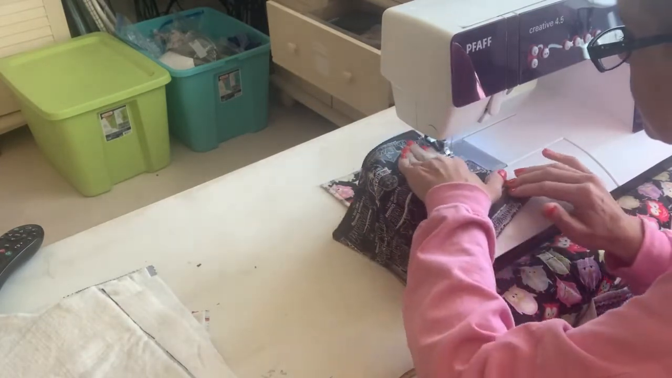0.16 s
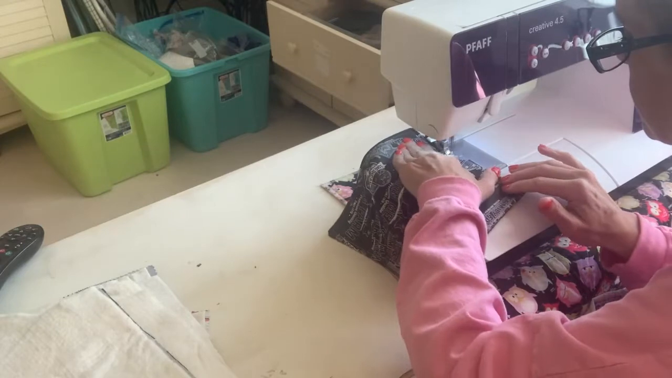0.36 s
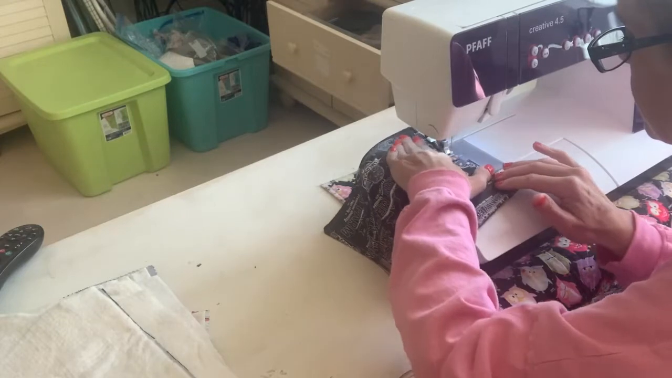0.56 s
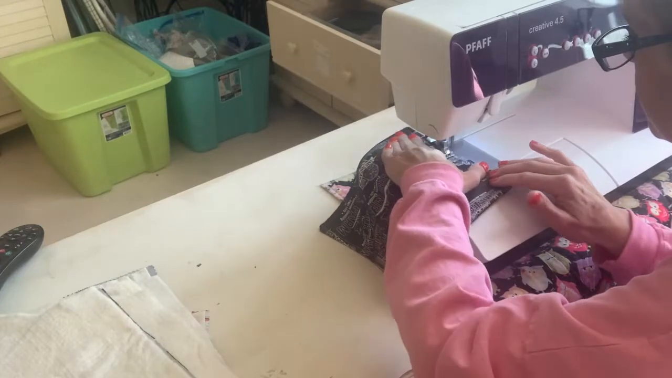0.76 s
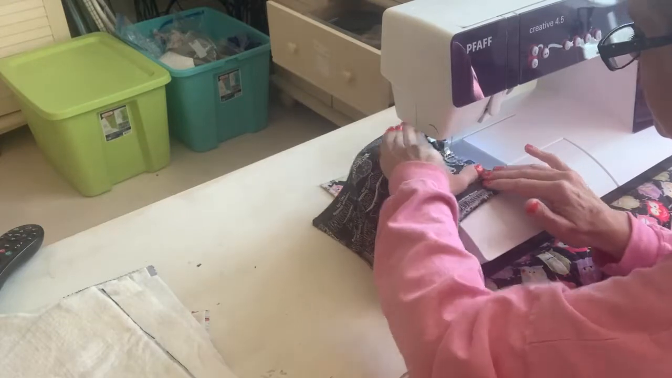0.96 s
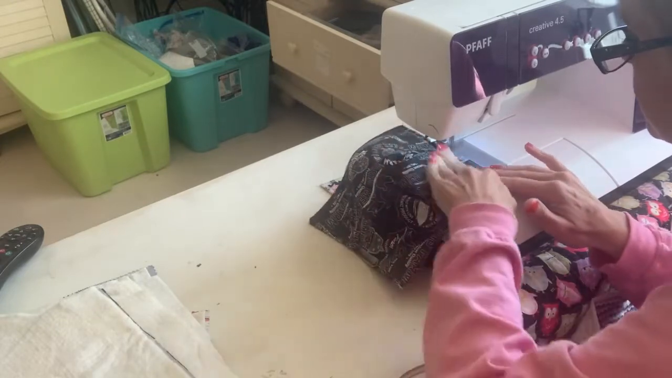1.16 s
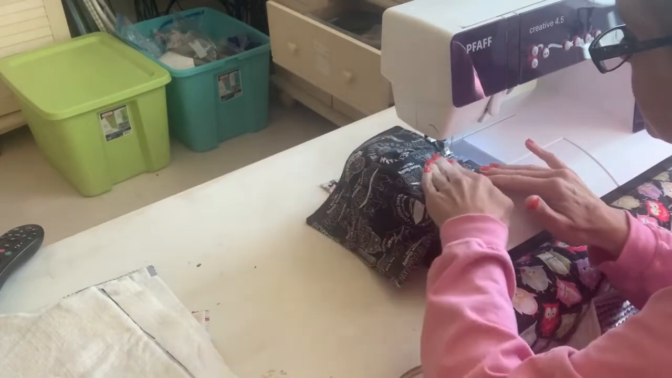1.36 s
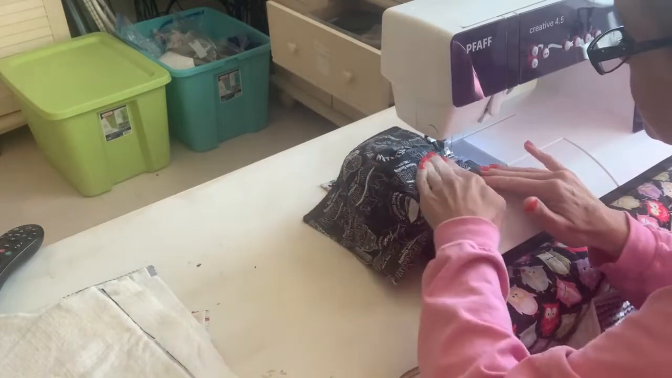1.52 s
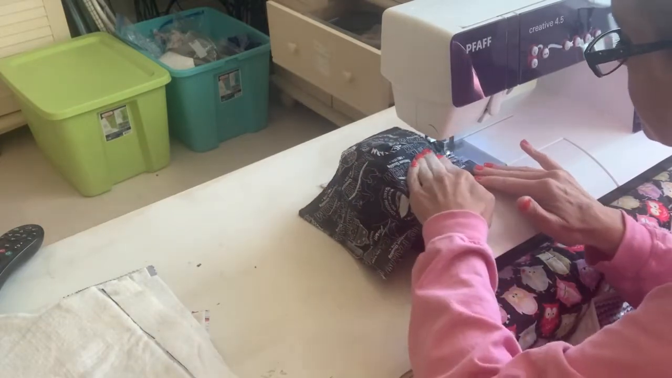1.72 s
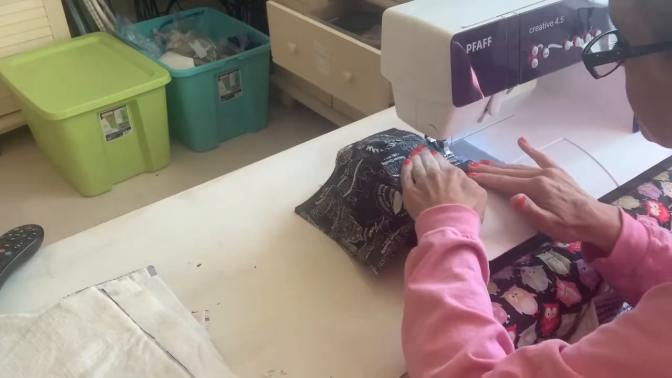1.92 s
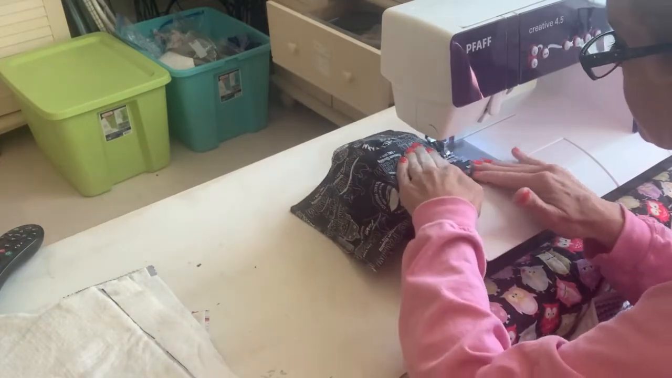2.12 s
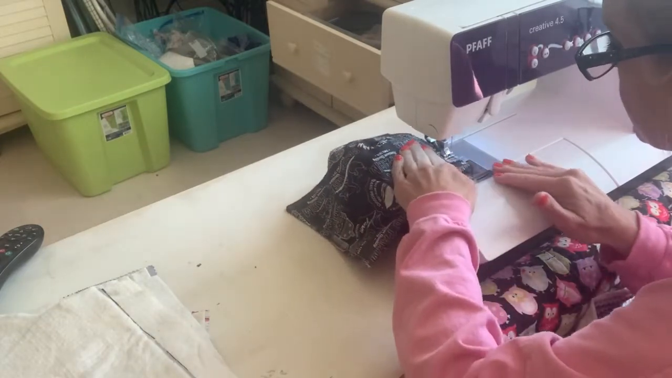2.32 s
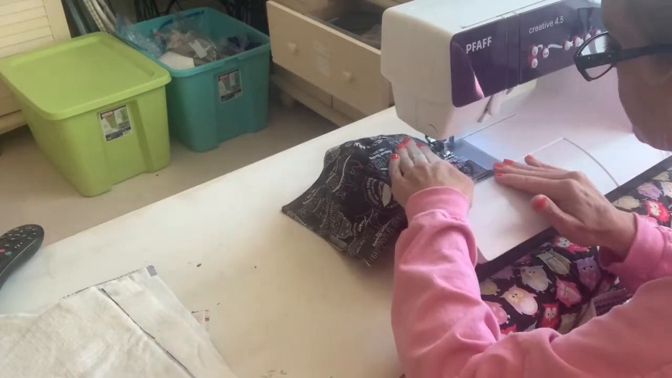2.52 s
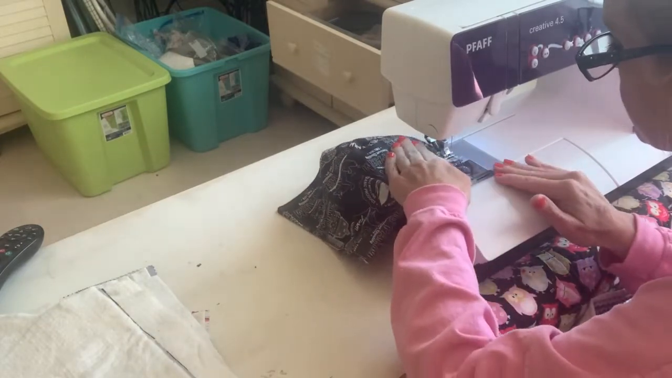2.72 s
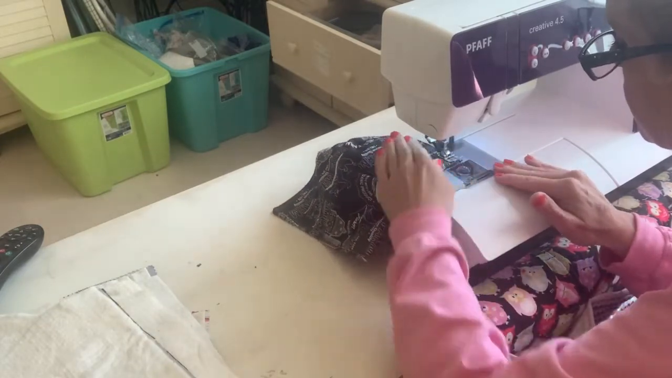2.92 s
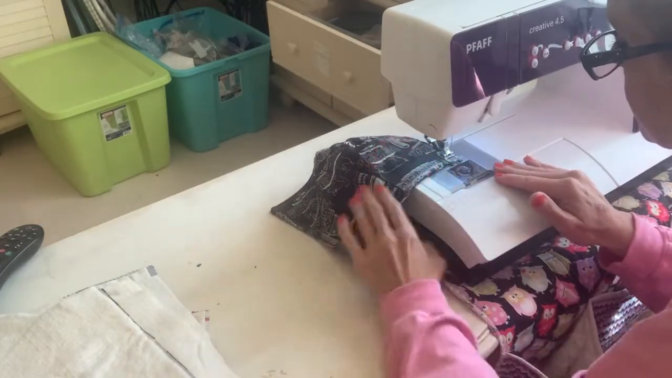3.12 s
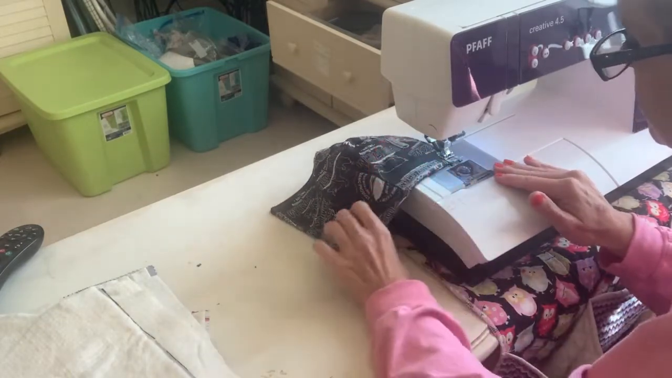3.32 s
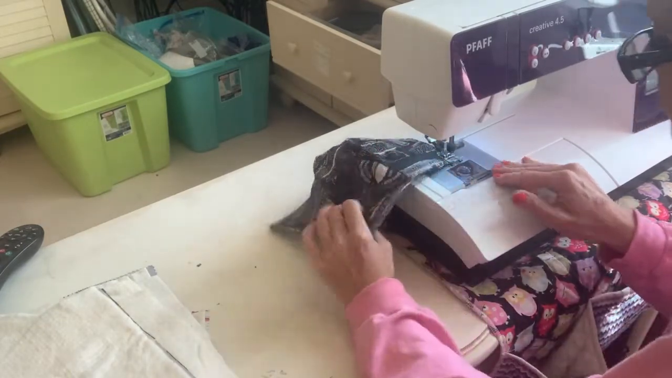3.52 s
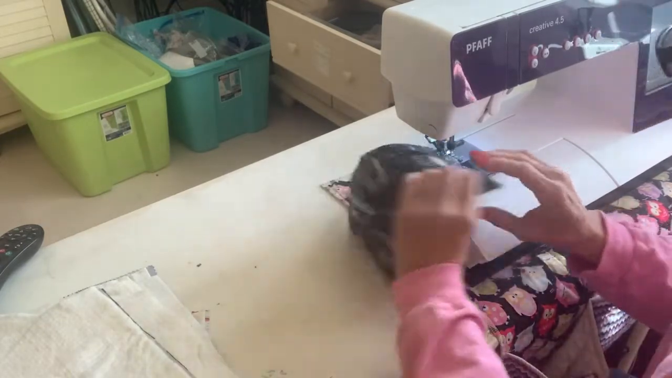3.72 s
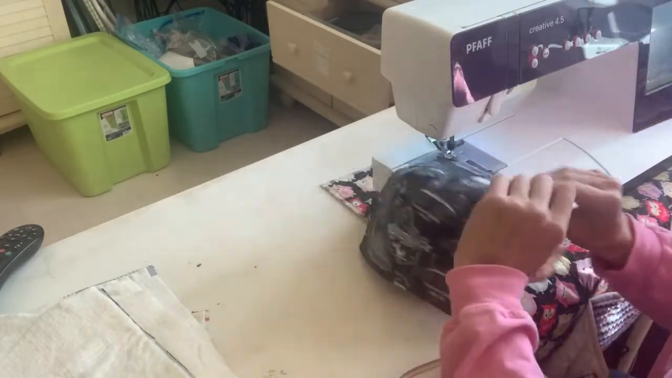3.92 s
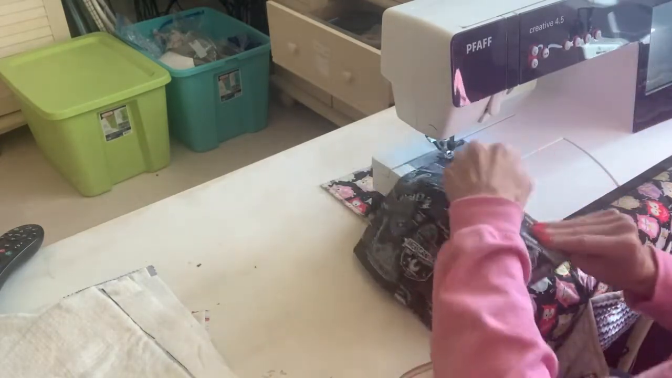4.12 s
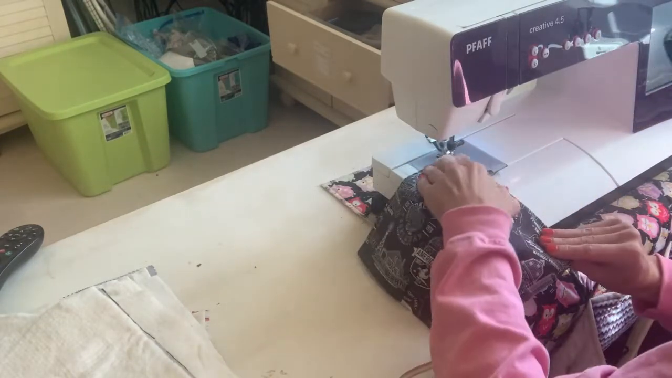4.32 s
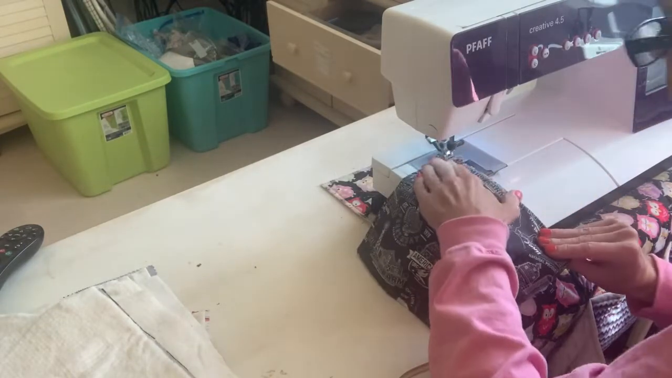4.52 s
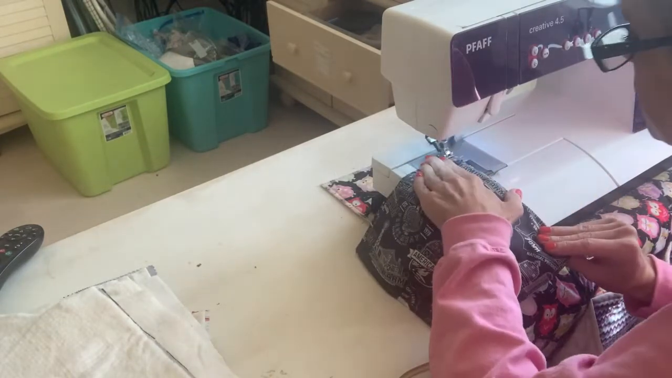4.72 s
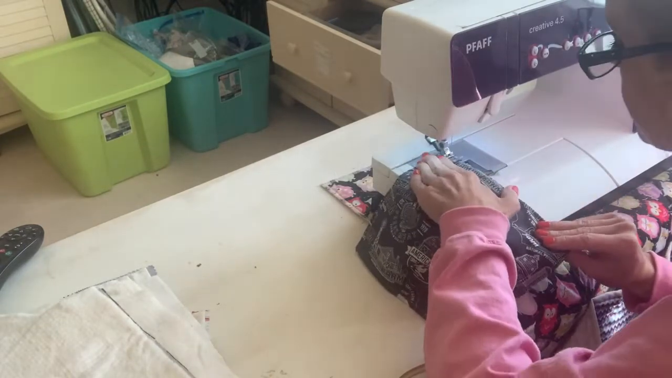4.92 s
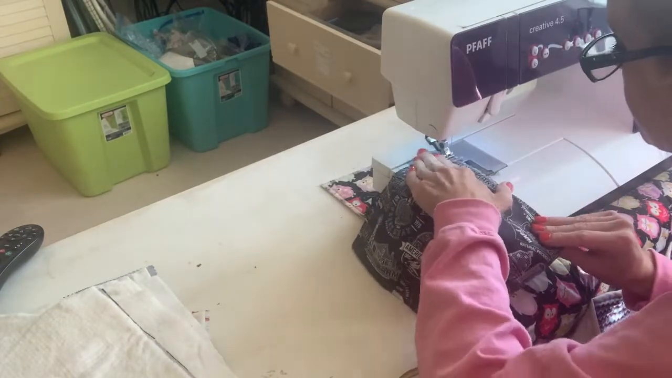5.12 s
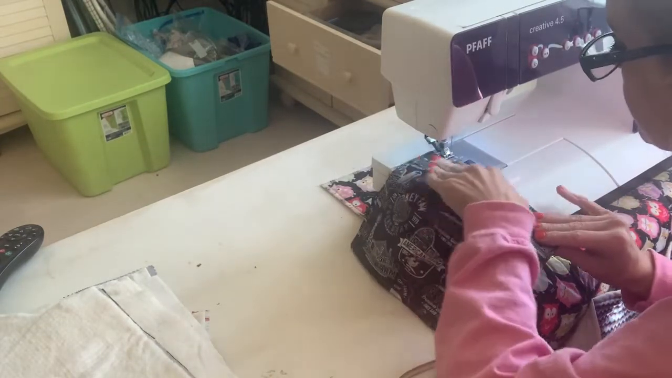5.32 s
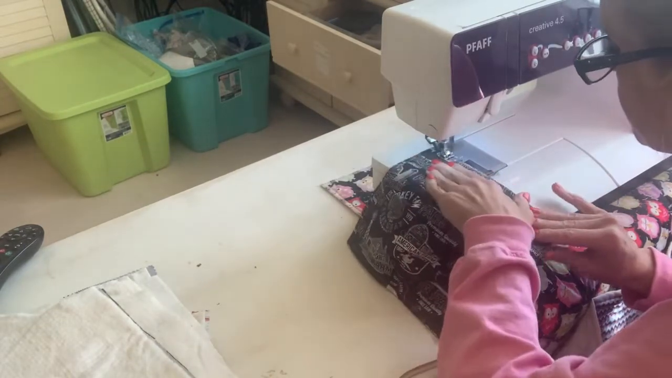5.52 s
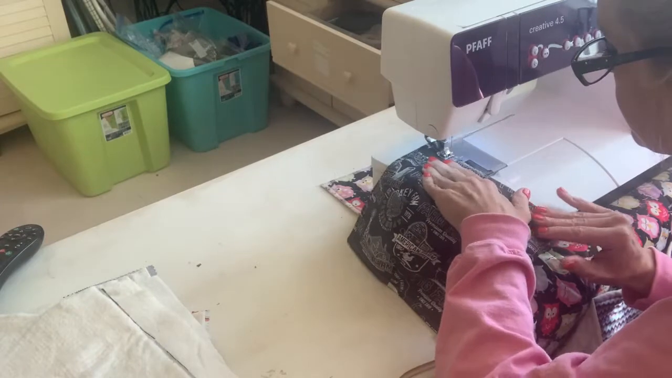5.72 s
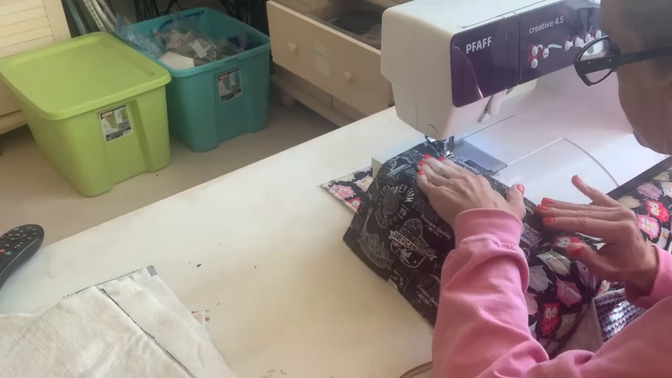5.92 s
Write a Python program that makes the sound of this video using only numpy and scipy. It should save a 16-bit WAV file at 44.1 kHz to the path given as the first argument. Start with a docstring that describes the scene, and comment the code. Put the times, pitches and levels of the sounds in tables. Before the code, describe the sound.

Rapid sewing machine clatter and whine, broken by a short pause of soft fabric rustling and clicks, then steady stitching again indoors.

```python
"""An electric sewing machine stitches at full speed through layered fabric, stops, and runs up again.
Every shaft turn repeats the same frame shake, linkage taps, gear ring and thread ticks over the whine
of the toothed drive and the rumble of the table. In the pause hands turn the cloth and the presser foot
comes down, ringing. Scattered knocks thump the table; a small room answers."""
import sys
import numpy as np
from scipy import signal
from scipy.fft import rfft, irfft, next_fast_len
from scipy.io import wavfile
from scipy.ndimage import uniform_filter1d, map_coordinates

SR = 44100
rng = np.random.default_rng(int(sys.argv[2]) if len(sys.argv) > 2 else 0)


def wav_record(signal):
    """Record a signal, one row per channel, as 16-bit PCM in the file named by sys.argv[1]."""
    frames = np.transpose(np.atleast_2d(signal))
    bounded = np.clip(frames, -1, 1)
    # unit amplitude maps onto the largest positive 16-bit level
    quanta = np.round(bounded * 32767).astype(np.int16)
    wavfile.write(sys.argv[1], SR, quanta)


N = 267246
TIME_S = np.arange(N) / SR
TOP_STITCH_HZ = 17.4986  # one stitch per shaft turn


def amp(db):
    """Decibels to gain."""
    return 10 ** (np.asarray(db) / 20)


def unit(x):
    """Scale the channel mean to rms 1."""
    return x / np.sqrt(np.mean(np.atleast_2d(x).mean(0) ** 2) + 1e-20)


def along(points, hz):
    """Interpolate (frequency [Hz], value) points on a log axis."""
    point_hz, values = np.transpose(points)
    return np.interp(np.log(hz + 1), np.log(point_hz + 1), values)


def wobble(rate_hz):
    """Smooth random curve with knots at rate_hz."""
    knots = rng.standard_normal(int(N * rate_hz / SR) + 4)
    coarse = np.arange(0, N + 64, 64)
    return np.interp(np.arange(N), coarse, map_coordinates(knots, [coarse * rate_hz / SR]))


def filtered(x, response):
    """Apply a complex frequency response."""
    size = next_fast_len(N + SR // 2, True)
    return irfft(rfft(x, size) * response(np.fft.rfftfreq(size, 1 / SR)), size)[..., :N]


def coloured(x, points, size=4096):
    """Minimum-phase filter through (frequency [Hz], gain [dB]) points."""
    cepstrum = irfft(np.log(amp(along(points, np.fft.rfftfreq(size, 1 / SR)))))
    cepstrum[1:size // 2] *= 2
    cepstrum[size // 2 + 1:] = 0
    return signal.fftconvolve(x, irfft(np.exp(rfft(cepstrum))))[:N]


def diffuse_noise(spectrum, correlation, left_db):
    """Stereo noise with a channel mean of rms 1."""
    mid, side = filtered(rng.standard_normal((2, N)), lambda hz: amp(along(spectrum, hz)))
    side = side * np.tan(np.arccos(np.clip(correlation, -.9, .9)) / 2)
    return unit(np.array([(mid + side) * amp(left_db), mid - side]))


# Room decay: (frequency [Hz], t60 [s])
ROOM_T60 = [(100, 0.15), (500, 0.45), (2000, 0.47), (6000, 0.38), (12000, 0.45)]
# Shading of the right side: (frequency [Hz], left minus right [dB])
BALANCE = [(60, 17), (100, -2), (170, 8.5), (300, 8), (510, 4), (860, 4.5), (1470, 11), (2500, 11.5),
           (4270, 14.5), (7270, 12)]
def in_room(x, wet_db, left_lag_s=.00047):
    """Direct sound reaches the shaded right side first; walls and table add a tail."""
    def shading(hz):
        balance_db = along(BALANCE, hz)
        return 2 * amp(np.outer([.5, -.5], balance_db)) / np.sqrt(amp(balance_db) + amp(-balance_db))

    hz, t, noise = signal.stft(rng.standard_normal((2, SR // 2)), SR, nperseg=256)
    response = signal.istft(noise * amp(-60 * t / along(ROOM_T60, hz)[:, None]), SR, nperseg=256)[1]
    response *= amp([[wet_db], [wet_db + 15.5]]) / np.linalg.norm(response[0])
    response[0, round(left_lag_s * SR)] += 1
    response[1, 0] += 1
    response /= np.linalg.norm(response, axis=1, keepdims=True)
    return filtered(signal.fftconvolve(x[None], response, axes=1)[:, :N], shading)


# Still-room spectrum: (frequency [Hz], relative level [dB])
ROOM_SPECTRUM = [(15, -52), (25, -2), (64, 2), (333, -12.5), (424, -11), (685, -14), (2960, -24.5),
                 (3420, -24.5), (4140, -25), (7720, -32), (10000, -35.5), (14000, -33), (17000, -120)]
def room_tone(level_db=-76):
    """Faint, steady noise of the room."""
    return amp(level_db) * diffuse_noise(ROOM_SPECTRUM, correlation=.16, left_db=-.5)


# Hand strokes: (start [s], length [s], drag [dB], swish [dB])
HAND_STROKES = [(3.076, 0.21, -59, -66), (3.354, 0.35, -62, -74), (3.616, 0.14, -65, -59),
                (3.768, 0.051, -53.5, -65.5), (3.93, 0.11, -71.5, -95), (4.277, .04, -73, -80),
                (4.356, 0.056, -65.5, -65), (4.487, 0.16, -64, -58), (4.64, 0.13, -56, -53.5)]
# Cloth friction spectra: (frequency [Hz], relative level [dB])
DRAG_SPECTRUM = [(25, -20), (50, -6), (150, -3.5), (280, -8), (480, -22), (800, -31), (1600, -39),
                 (3000, -40.5), (7500, -49), (11000, -74)]
SWISH_SPECTRUM = [(120, -16), (270, 3), (520, 1.5), (720, -3.5), (950, -14.5), (1250, -11), (2000, -29),
                  (3500, -28), (7000, -51), (11000, -51)]
def fabric(attack_s=.024, release_db_per_s=122, uneven_db=1):
    """Under each hand stroke the cloth drags dully over the table and swishes as it slides."""
    drag = swish = 0
    for start_s, length_s, drag_db, swish_db in HAND_STROKES:
        release = amp(-release_db_per_s * np.maximum(TIME_S - start_s - length_s, 0))
        stroke = np.clip((TIME_S - start_s) / attack_s, 0, 1) * release
        drag = np.hypot(drag, amp(drag_db) * stroke)
        swish = np.hypot(swish, amp(swish_db) * stroke)
    uneven = amp(uneven_db * wobble(35))
    drag = drag * diffuse_noise(DRAG_SPECTRUM, correlation=.2, left_db=-.5)
    swish = swish * diffuse_noise(SWISH_SPECTRUM, correlation=0, left_db=6)
    return uneven * (drag + swish)


# Presser arm modes: (frequency [Hz], relative level [dB], t60 [s])
ARM_MODES = [(845, 1, 0.12), (1080, 3.5, 0.13), (1166, 12.5, 0.095), (1240, 8, 0.11), (1502, -16, .15)]
def presser_foot(start_s=4.524, attack_s=.005, gain_db=-51.5):
    """The foot comes down on the seam and its arm rings."""
    t = np.maximum(TIME_S - start_s, 0)
    flutter_rad = .5 * wobble(120)
    ring = sum(amp(db - 60 * t / t60_s) * np.sin(2 * np.pi * hz * t + flutter_rad)
               for hz, db, t60_s in ARM_MODES)
    return amp(gain_db) * in_room(ring * (1 - np.exp(-t / attack_s)), wet_db=-7)


# Presser foot, needle bar, table bumps: (time [s], thump gain [dB], clack gain [dB], click gain [dB])
KNOCK_EVENTS = [(0.635, -34, -38, -54), (1.644, -39, -35, -38.5), (1.874, -42, -34, -53),
                (3.124, -47, -51, -46.5), (3.634, -50, -56, -75), (3.816, -39.5, -48, -55.5),
                (3.832, -38, -69, -72), (4.004, -75, -79, -95), (4.357, -54, -52, -50),
                (4.389, -48, -55, -56), (4.523, -57, -51.5, -85), (4.535, -62, -54, -85),
                (4.618, -59, -56, -78), (4.674, -64, -50, -51), (4.695, -61, -43.5, -46.5),
                (4.816, -54, -57, -45.5), (4.862, -34.5, -42, -49), (4.91, -49, -49, -45),
                (5.16, -40.5, -39, -47), (5.956, -38, -29, -41), (5.973, -45, -32.5, -50)]
# Table modes: (frequency [Hz], relative level [dB], t60 [s])
TABLE_MODES = [(105, 1.5, 0.18), (133, -8.5, 0.14), (206, -8, 0.072), (295.3, 0, 0.092), (395, -7.5, 0.076),
               (523, -7, 0.1)]
# Casing clack and steel click spectra: (frequency [Hz], relative level [dB])
CLACK_SPECTRUM = [(250, -32), (530, 2.5), (700, -7), (820, -10), (970, -4.5), (1150, -1.5), (1350, -5),
                  (2000, -9), (2700, -11.5), (3600, -34), (7000, -65)]
CLICK_SPECTRUM = [(1500, -9), (2600, -2.5), (3200, -5), (4000, -2.5), (4800, -6.5), (5400, -4), (6300, -4),
                  (8000, -16), (10000, -31), (11500, -36), (13500, -61)]
def knocks(firm_db=-43, rattle_t60_s=.071):
    """Each contact thumps the table and rattles the casing and the steel."""
    t = np.arange(SR // 2) / SR
    blows = np.zeros((3, N + SR))
    for start_s, thump_db, clack_db, click_db in KNOCK_EVENTS:
        tilt_db_per_oct = .64 * min(thump_db - firm_db, 0)  # a light touch barely moves the low modes
        thump = 0
        for hz, db, t60_s in TABLE_MODES:
            mode_db = db + tilt_db_per_oct * np.log2(300 / hz) + rng.normal(0, 1)
            thump += amp(mode_db - 60 * t / t60_s) * np.sin(2 * np.pi * hz * t)
        thump *= 1 - np.exp(-t / .0051)
        rattle = rng.standard_normal((2, len(t))) * amp(-60 * t / rattle_t60_s)
        rattle *= 1 - np.exp(-t / .00045)
        blow = amp([[thump_db], [clack_db], [click_db]]) * np.vstack([thump, rattle])
        at = round(start_s * SR)
        blows[:, at:at + len(t)] += blow
    thumps, clacks, clicks = blows[:, :N]
    rattles = 0
    for bursts, spectrum in (clacks, CLACK_SPECTRUM), (clicks, CLICK_SPECTRUM):
        gains = amp(along(spectrum, np.linspace(0, SR / 2, SR // 2)))
        rattles += coloured(bursts, spectrum) / np.sqrt(np.mean(gains ** 2))
    return in_room(rattles, wet_db=-.5) + in_room(thumps, wet_db=-5)


# Shaking table spectrum: (frequency [Hz], relative level [dB])
RUMBLE_SPECTRUM = [(12, -43), (20, -12), (48, 4.5), (91, 4), (150, -5), (200, -15), (330, -120)]
def table_rumble(pace, lag_s=.11, level_db=-44.5, waver_db=1.9):
    """The table shakes unevenly and lags behind the shaft as it stops and starts."""
    pole = np.exp(-1 / (lag_s * SR))
    sway = signal.lfilter([1 - pole], [1, -pole], pace, zi=[pole * pace[0]])[0]
    envelope = amp(level_db + waver_db * wobble(4.3)) * sway ** 1.3
    return envelope * diffuse_noise(RUMBLE_SPECTRUM, correlation=.4, left_db=-3.5)


# Whine radiated by the casing: (frequency [Hz], gain [dB])
WHINE_RADIATION = [(600, -79), (950, -49), (1300, -75), (1500, -57), (1650, -45), (1780, -53), (1900, -63),
                   (2100, -65), (3200, -70), (3750, -53), (4200, -58)]
def drive_whine(turns, pace, teeth_per_turn=120):
    """The motor's toothed drive sounds a fluttering tone that rises with speed; its octave joins late."""
    mesh_hz = teeth_per_turn * TOP_STITCH_HZ * pace
    phase = 2 * np.pi * teeth_per_turn * turns + .8 * wobble(130)
    tone = amp(along(WHINE_RADIATION, mesh_hz) + 2.5 * wobble(60)) * np.sin(phase)
    octave = amp(along(WHINE_RADIATION, 2 * mesh_hz) + 4.3 * wobble(60)) * np.sin(2 * phase)
    coasting = np.gradient(pace) * SR < -1  # motor off during run-down
    powered = uniform_filter1d((pace > 0) * (1. - coasting), size=SR // 30)
    return in_room((tone + octave * pace ** 4) * powered, wet_db=-3)


def contacts(turns, angles, sizes, jitter_s, scatter_db):
    """Impulses as the shaft passes the given angles [turns], scattered in time and strength."""
    passes = np.arange(int(turns[-1]) + 1)[:, None] + angles
    at = np.interp(passes, turns, np.arange(N), left=-N, right=2 * N)
    at += jitter_s * SR * rng.standard_normal(at.shape)
    strength = sizes * amp(scatter_db * rng.standard_normal(at.shape))
    inside = (at >= 0) & (at < N)
    return np.bincount(at[inside].astype(int), strength[inside], N)


# Load over one stitch: (angle [turns], linkage gain [dB], thread gain [dB])
STITCH_LOAD = [(0, 5, -23), (.12, 0, 17), (.28, -4, -25), (.38, 5, -5), (.48, -1.5, 10.5), (.55, 0.5, 11),
               (0.681, 8, 18), (.78, 2, 16), (.86, 2.5, 3.5), (.93, 4, -11)]
def load(angle):
    """Linkage and thread gains at a shaft angle [turns]."""
    angles, *columns_db = np.transpose(STITCH_LOAD)
    return [amp(np.interp(angle, angles, db, period=1)) for db in columns_db]


# Thread tick colour: (frequency [Hz], gain [dB])
THREAD_RESPONSE = [(2500, -45), (4700, -12), (5350, 8), (5900, 0), (6450, 0.5), (7400, -11), (9000, -24.5),
                   (10400, -27.5), (11500, -31.5), (13000, -58)]
def thread(turns, slips_per_turn=90, snap_angle=.935, snap_t60_s=.016, slack_db=-10, slack_until_s=.88):
    """Thread rasps through the cloth in tiny slips and snaps off the hook, softly while slack."""
    angles = np.arange(slips_per_turn) / slips_per_turn
    _, rasp = load(angles)
    sizes = rasp / np.linalg.norm(rasp) * rng.choice([-1, 1], slips_per_turn)
    slips = contacts(turns, angles, sizes, jitter_s=.0004, scatter_db=3)
    snaps = contacts(turns, np.array([snap_angle]), amp(-1.5), jitter_s=.0003, scatter_db=1.5)
    snaps *= amp(slack_db * (TIME_S < slack_until_s))
    t = np.arange(SR // 50) / SR
    chatter = rng.standard_normal(len(t)) * amp(-60 * t / snap_t60_s)
    snaps = signal.fftconvolve(snaps, chatter / np.linalg.norm(chatter))[:N]
    return unit(in_room(coloured(slips + snaps, THREAD_RESPONSE), wet_db=-9.5))


# Metal part modes: (frequency [Hz], bandwidth [Hz], gain [dB])
METAL_MODES = [(1285, 117, 1), (2370, 200, -2.5), (4034, 570, 1.5), (4230, 160, -23)]
def gears(turns, teeth_per_turn=48, play=.87):
    """Meshing, grinding teeth keep the metal parts ringing inside the housing."""
    def metal(hz):
        return sum(amp(db) * 1j * hz * width_hz / (mode_hz ** 2 - hz ** 2 + 1j * hz * width_hz)
                   for mode_hz, width_hz, db in METAL_MODES)

    angles = np.arange(teeth_per_turn) / teeth_per_turn
    teeth = contacts(turns, angles, rng.standard_normal(teeth_per_turn), jitter_s=.0002, scatter_db=1.5)
    grind = play * rng.standard_normal(N) * (np.gradient(turns) > 0)
    muffled = coloured(unit(teeth) + grind, [(4400, -4), (5000, -29), (7500, -10), (12000, -60)])
    return unit(in_room(filtered(muffled, metal), wet_db=-11))


# Casing colour: (frequency [Hz], gain [dB])
CASING_RESPONSE = [(70, -37.5), (130, -10.5), (260, -3.5), (330, -6), (430, -3), (700, 3), (880, -6.5),
                   (1080, -3.5), (1350, -6.5), (2200, -10), (3100, -16.5), (4700, -20), (6500, -20.5),
                   (7800, -31.5), (10000, -42), (12500, -92)]
def linkage(turns, pace, taps_per_turn=70, play=.87):
    """Cams and joints tap at the same angles each turn; loose play adds chance rattles between them."""
    angles = (np.arange(taps_per_turn) + rng.random(taps_per_turn)) / taps_per_turn
    sizes = load(angles)[0] * rng.choice([-1, 1], taps_per_turn)
    taps = contacts(turns, angles, sizes, jitter_s=.0003, scatter_db=3)
    taps = coloured(unit(taps), [(300, -12), (650, -13.5), (850, -1.5)])  # light parts, little bass
    rattle = unit(rng.standard_normal(N) * load(turns)[0] * (pace > 0))
    rattle = coloured(rattle, [(250, 2), (600, -4), (900, -1)])
    return unit(in_room(coloured(taps + play * rattle, CASING_RESPONSE), wet_db=-3.5))


# Frame harmonics: (order [x stitch rate], relative level [dB])
FRAME_HARMONICS = [(1, -28), (2, -10), (3, -5), (4, -3), (5, -3), (6, 0), (7, -9), (8, -5), (9, -11),
                   (10, -6), (11, -8), (12, -14), (13, -14), (14, -11), (15, -3), (16, -11), (17, -9),
                   (18, -11), (19, -21), (20, -10), (21, -10), (22, -14), (23, -8), (24, -7), (25, -11),
                   (26, -11), (27, -9), (28, -11), (29, -15), (30, -13), (31, -12), (32, -11), (33, -20),
                   (34, -21), (35, -21), (36, -10), (37, -17), (38, -12), (39, -9), (40, -13), (41, -14),
                   (42, -14)]
# Stereo likeness of the frame tones: (frequency [Hz], left-right correlation [-1..1])
FRAME_CORRELATION = [(60, 0.31), (120, -0.14), (240, -0.51), (470, -0.28), (930, -0.29), (1850, 0.09),
                     (3660, 0.21), (7270, 0.21)]
def frame_shake(turns, blow_angle=.77, spread_rad=1.52):
    """The needle's blow shakes the frame at stitch-rate harmonics, each with its own stereo phase."""
    shake = np.zeros((2, N))
    for order, db in FRAME_HARMONICS:
        top_hz = order * TOP_STITCH_HZ
        right_rad = rng.choice([-1, 1]) * np.arccos(np.clip(along(FRAME_CORRELATION, top_hz), -1, 1))
        right = amp(-along(BALANCE, top_hz)) * np.exp(1j * right_rad)
        sides = np.array([[1], [right]]) * 2 / abs(1 + right)
        drift_rad, waver_db = .3 * wobble(12), 2 * wobble(9)
        phase = 2 * np.pi * order * (turns - blow_angle) + spread_rad * rng.standard_normal()
        shake += amp(db + waver_db) * abs(sides) * np.cos(phase + drift_rad + np.angle(sides))
    bass_cut = [(40, -29), (70, .5), (100, -.5), (200, -1), (450, 0), (720, 0)]
    return unit(filtered(shake, lambda hz: amp(along(bass_cut, hz))))


# Pedal presses: (down [s], up [s])
PEDAL_PRESSES = [(-3, 2.99), (4.655, 7)]
def shaft_pace(run_up_tau_s=.226, brake_s=.2845):
    """Share of top speed: eases up while the pedal is down, brakes linearly after."""
    pace = 0
    for down_s, up_s in PEDAL_PRESSES:
        run_up = 1 - np.exp(-np.maximum(TIME_S - down_s, 0) / run_up_tau_s)
        pace += run_up * np.clip(1 - (TIME_S - up_s) / brake_s, 0, 1)
    return pace


def machine(first_angle=.98, seam_s=5.29, seam_rise_s=.19, seam_db=2):
    """One shaft moves all parts, louder with speed; frame and linkage work harder on the thick seam."""
    pace = shaft_pace()
    turns = first_angle + np.cumsum(TOP_STITCH_HZ * pace) / SR
    effort = amp(seam_db * np.clip((TIME_S - seam_s) / seam_rise_s, 0, 1))
    rumble = table_rumble(pace)
    shake = amp(-42.5) * pace ** 3.3 * frame_shake(turns)
    taps = amp(-44.5) * pace ** 1.97 * linkage(turns, pace)
    ring = amp(-52) * pace ** 2.9 * gears(turns)
    ticks = amp(-55) * pace ** 3 * thread(turns)
    return rumble + effort * (shake + taps) + ring + ticks + drive_whine(turns, pace)


def scene():
    """Machine, handling and the still room."""
    return machine() + knocks() + presser_foot() + fabric() + room_tone()


def record(dry, cutoff_hz=14400):
    """Brick-wall low-pass."""
    return filtered(dry, lambda hz: hz < cutoff_hz)


dry = scene()
out = record(dry)
wav_record(out)
```